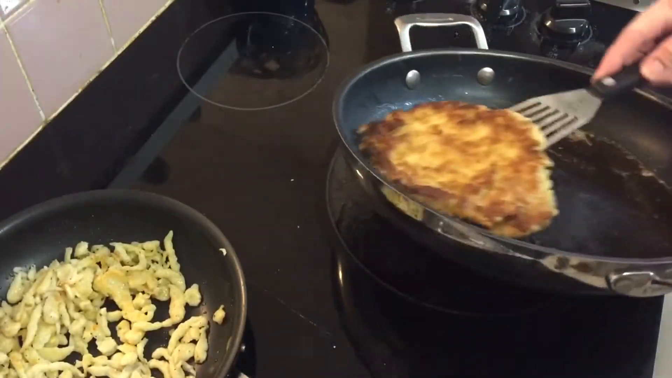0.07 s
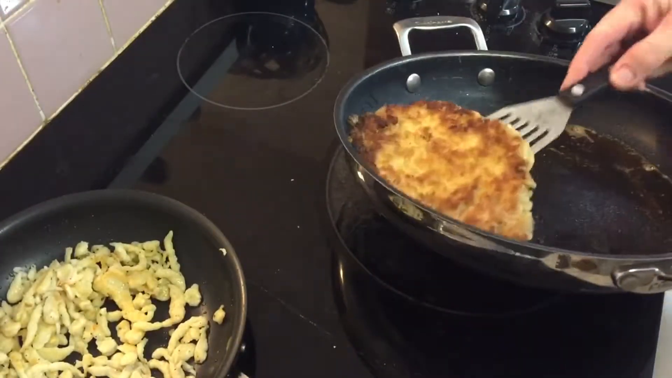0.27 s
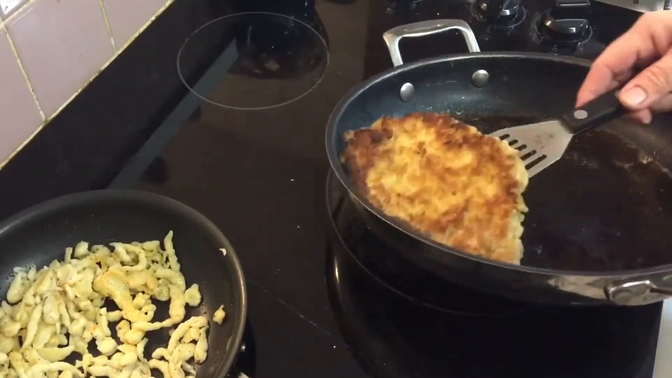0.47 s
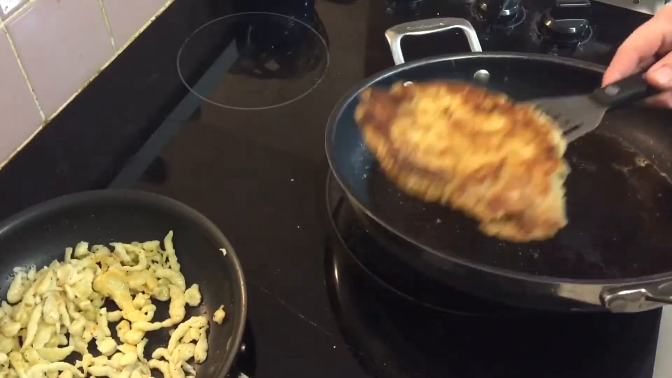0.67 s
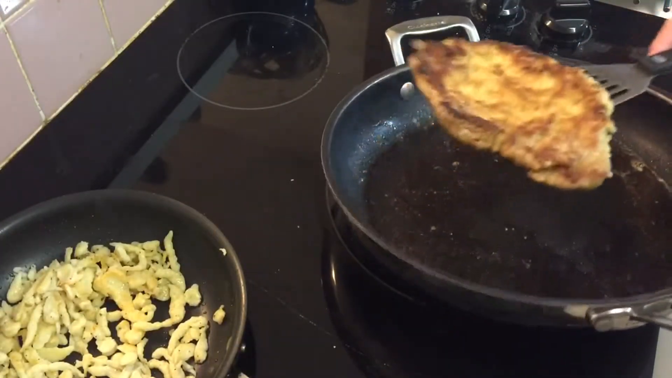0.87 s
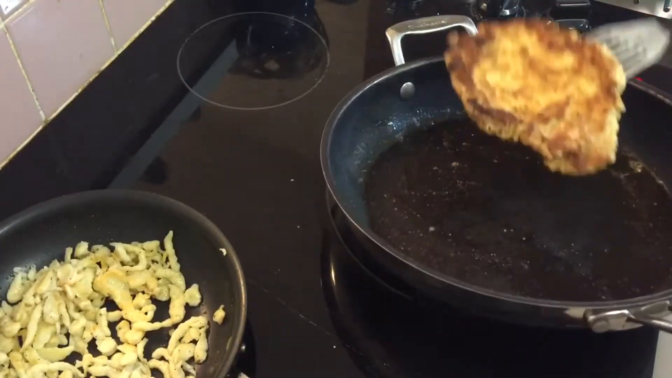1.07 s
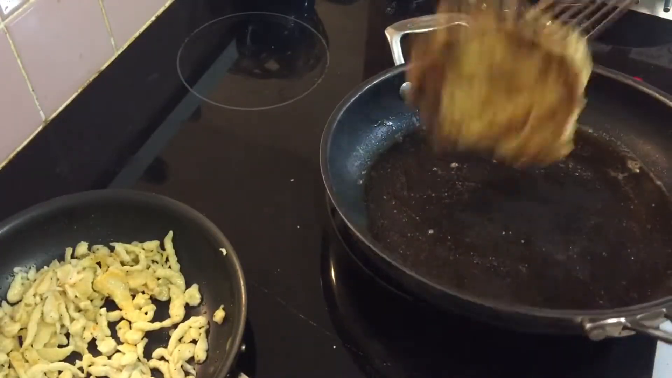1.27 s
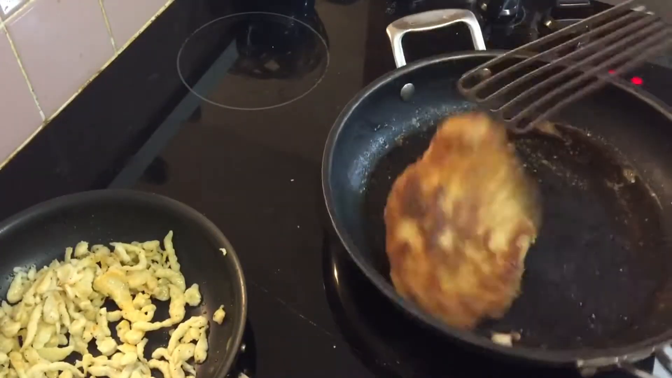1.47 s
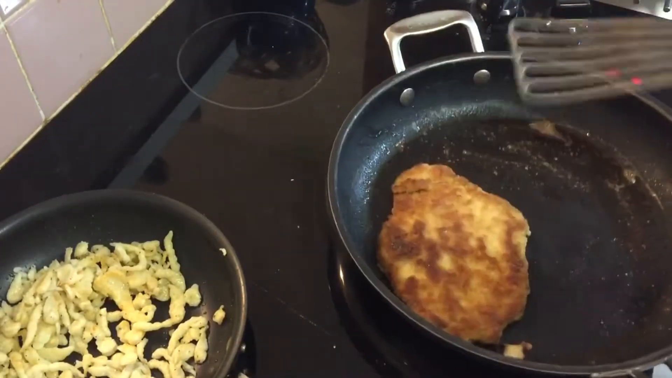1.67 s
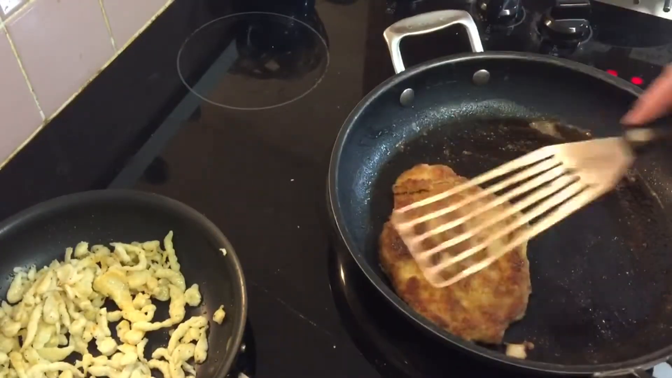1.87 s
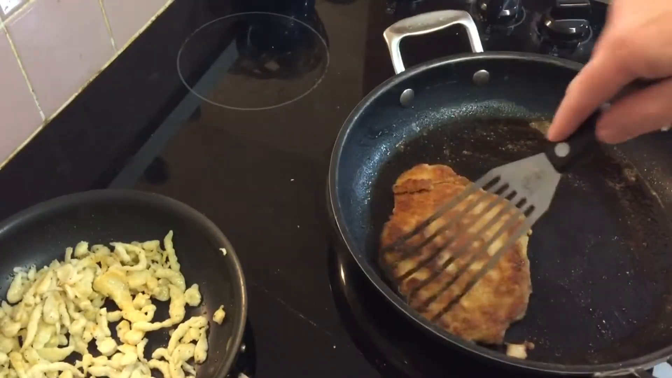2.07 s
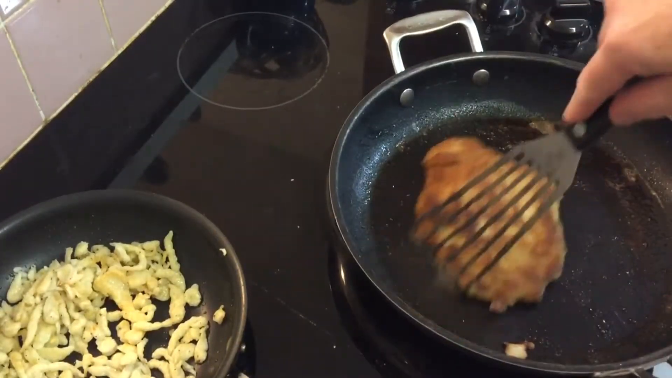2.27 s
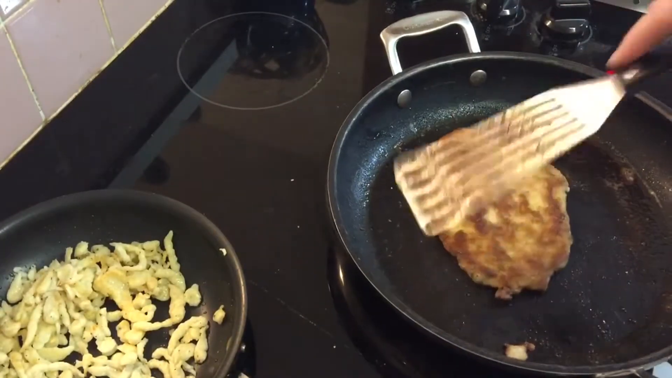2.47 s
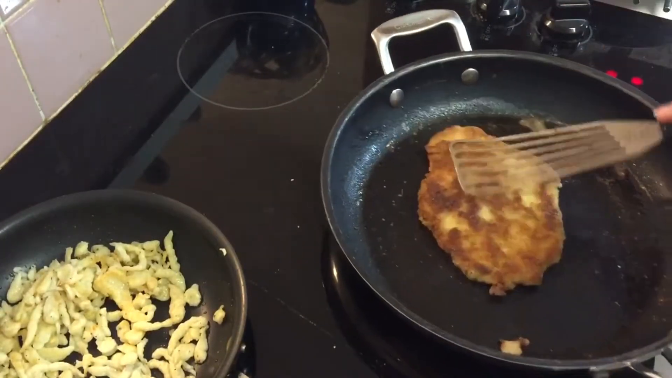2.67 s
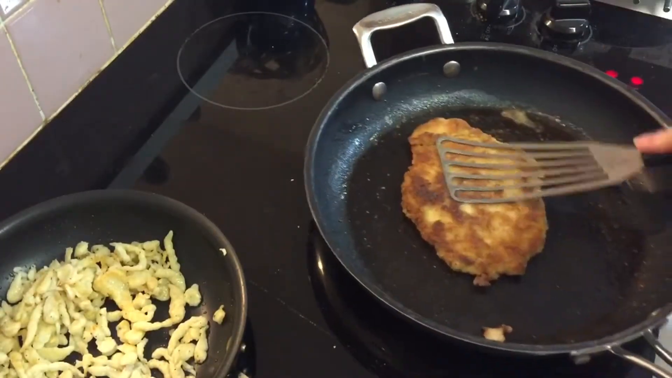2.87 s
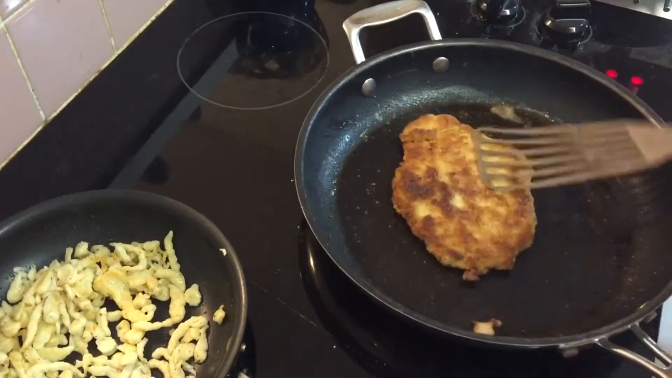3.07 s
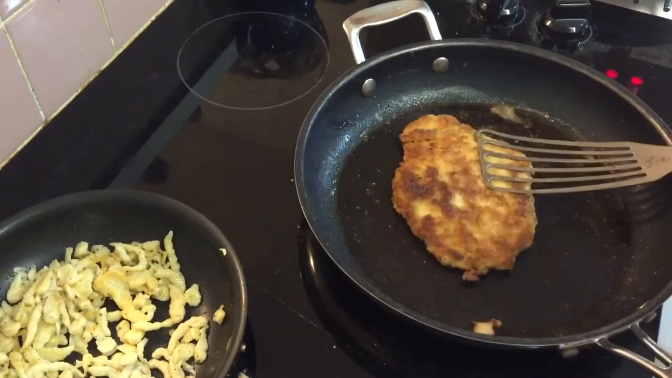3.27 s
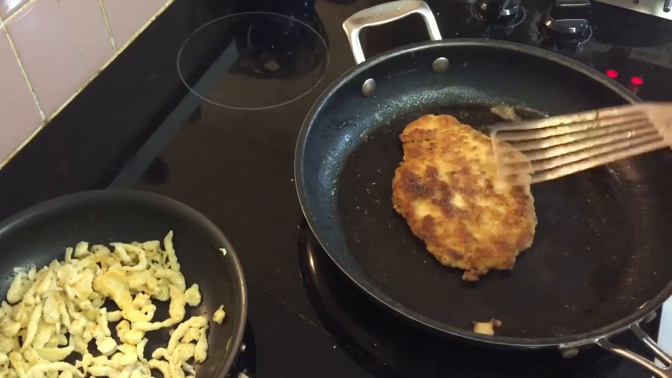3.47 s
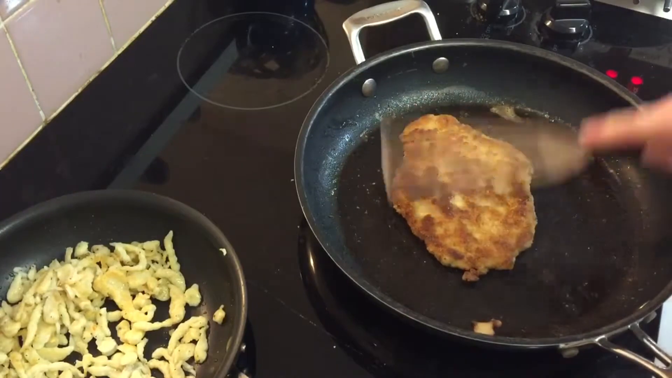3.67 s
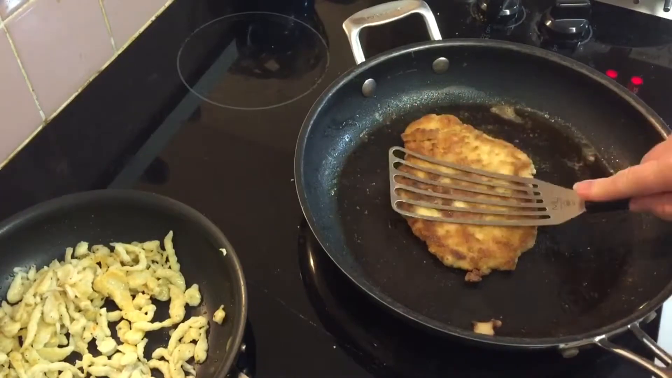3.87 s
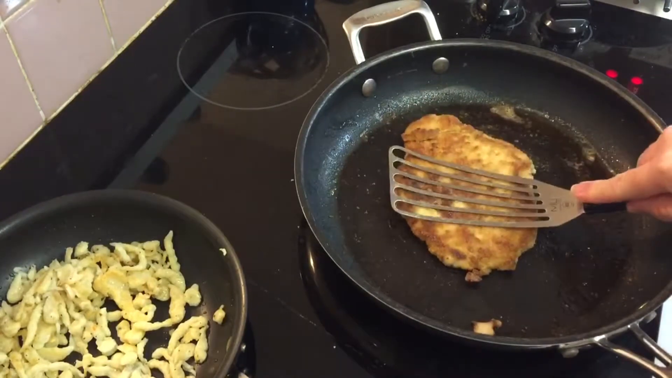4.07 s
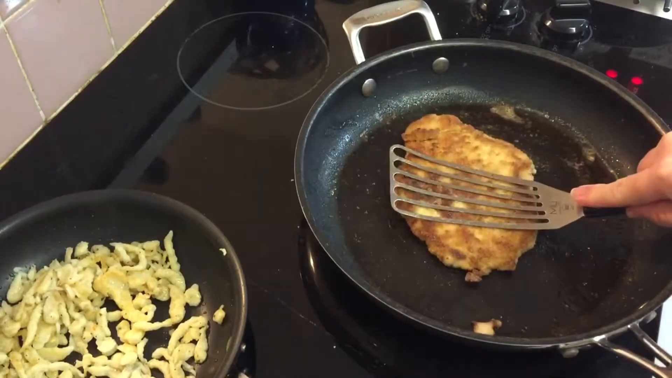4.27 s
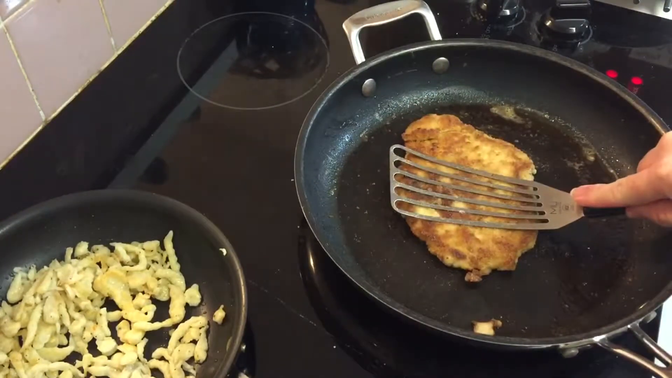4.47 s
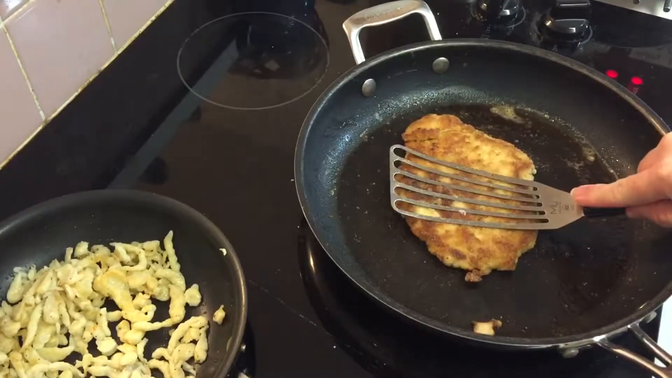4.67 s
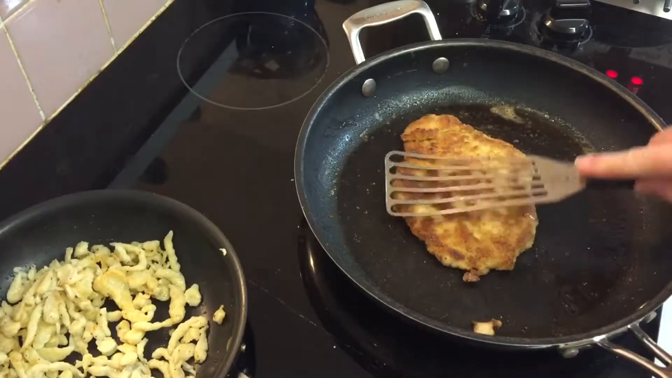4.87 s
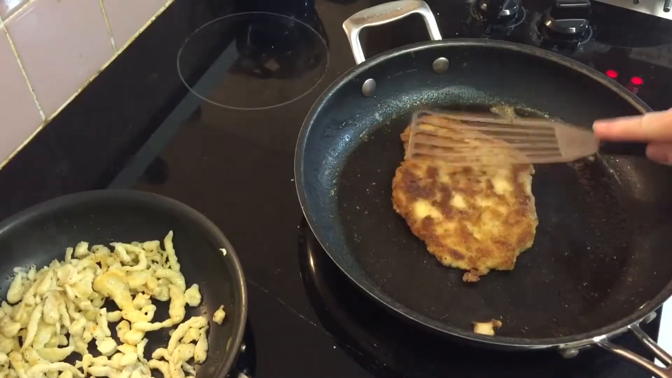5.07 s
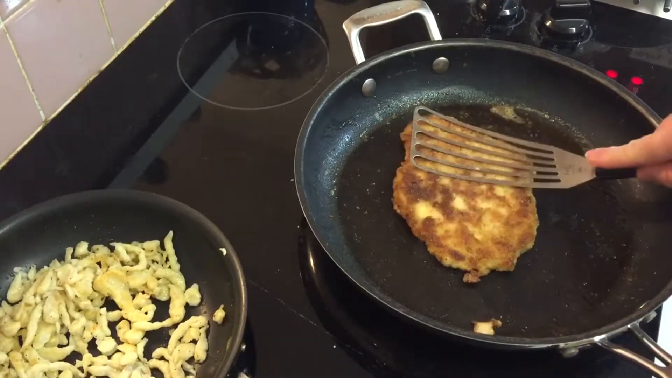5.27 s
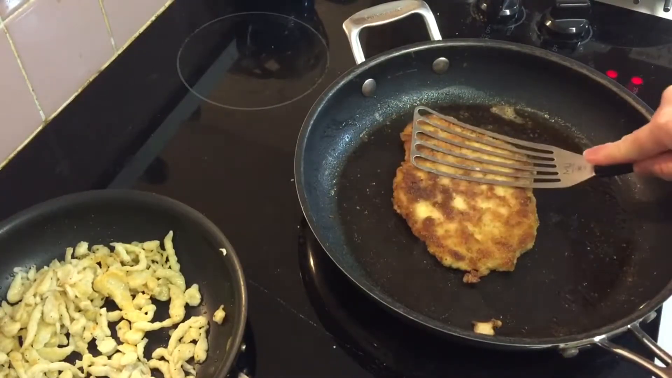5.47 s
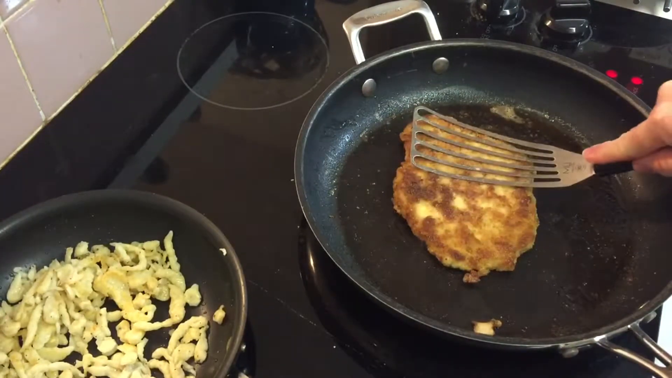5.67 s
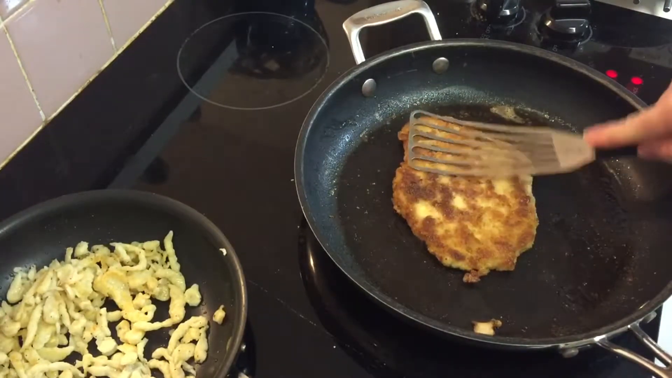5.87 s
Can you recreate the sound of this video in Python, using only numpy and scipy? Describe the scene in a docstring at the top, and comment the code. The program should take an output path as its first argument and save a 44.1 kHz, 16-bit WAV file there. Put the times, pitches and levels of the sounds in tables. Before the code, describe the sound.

Hot oil sizzles and spits in a skillet as a metal spatula scrapes under a cutlet, flips, pats and presses it.

```python
"""Hot oil sizzles in a skillet as a breaded cutlet is scooped up, flipped and pressed.
Steam bubbles of three sizes burst in the oil, drops spit, and steam whistles out of the crust.
A slotted steel spatula scrapes, pats and presses, making the steel ring and the pan thud.
The cooktop hums below, and everything reaches one close microphone."""
import sys
import numpy as np
from scipy import signal
from scipy.fft import rfft, irfft
from scipy.io import wavfile

SR = 44100
rng = np.random.default_rng(int(sys.argv[2]) if len(sys.argv) > 2 else 0)


def dump(signal):
    """Clip the signal to [-1, 1] and save it as 16-bit WAV at the path in sys.argv[1]."""
    limited = np.clip(np.atleast_2d(signal).T, -1, 1)
    pcm = np.round(limited * 32767).astype(np.int16)
    wavfile.write(sys.argv[1], SR, pcm)


N = 261513
TIME = np.arange(N) / SR

# The cooktop's hum. Each row: pitch in Hz, relative level in dB.
HUM_TONES = [(119.5, 2), (240, -19.5)]
# The tone of the low rumble. Each row: frequency in Hz, relative level in dB.
RUMBLE_SPECTRUM = [(12, -74), (20, -69), (49, 2), (91, 1), (113, -16), (133, -7.5), (146, -20), (200, -40),
                   (260, -63), (440, -120)]
# The pan is jolted on the glass top. Each row: time of full strength, hold, rise and fall in seconds,
# then the levels of the shifting and of the rumble in dB.
PAN_JOLTS = [(.3, 0.088, .4, 0.33, -66, -67), (1.6, 0.068, 0.069, 0.21, -52.5, -56),
             (2.22, 0.03, 0.23, 0.19, -54, -65), (2.99, .0, 0.38, 0.27, -63.5, -62),
             (3.28, .05, 0.1, 0.18, -56.5, -67), (4.0, 0.67, 0.25, 0.51, -66.5, -79),
             (5.3, 0.3, .3, .3, -77, -75)]
# Steam whistles, one list each. Each row: time in seconds, pitch in Hz, rasp pitch in Hz,
# rasp level in dB relative to the tone, overall level in dB.
STEAM_WHISTLES = [
    [(1.72, 1015, 2050, -8, -62), (1.76, 1000, 2050, -16, -57.5), (1.85, 982, 2000, -2, -56.5),
     (2.0, 960, 2000, 1, -61.5), (2.14, 955, 1980, -14, -63)],
    [(2.42, 895, 1780, 20, -59), (2.46, 942, 1950, 18, -63), (2.5, 989, 2150, 17, -62.5),
     (2.54, 1015, 2350, 9, -61), (2.59, 1040, 2450, -5, -52)],
]
# How the spatula's blade and the pan ring. Each row: pitch in Hz, width in Hz, relative level in dB.
BLADE_MODES = [(1343, 64, -3), (1917, 43, 1.5), (2280, 110, -5), (2744, 29, 6), (3157, 30, -3),
               (3750, 83, 1), (4635, 53, 0.5), (5100, 32, -10), (5140, 65, -9), (6210, 46, -6),
               (6600, 96, -21), (6800, 43, -16), (7200, 160, -13), (8070, 170, -16)]
PAN_MODES = [(754, 36, -21), (1014, 20, 7), (1180, 48, 7), (1378, 15, 7), (1568, 17, 11.5), (2030, 110, 11),
             (2520, 140, 6.5), (3300, 180, -5), (3710, 82, 5), (4630, 79, 5)]
# The blade slides under the cutlet, then drags off the rim after the flip.
# Each row: time of full strength, hold, rise and fall in seconds, then level in dB.
BLADE_SCOOPS = [(0, .0, .05, 0.095, -37), (.21, 0.0036, .06, 0.19, -57), (.36, 0.042, 0.091, 0.088, -39),
                (.5, .05, .1, 0.18, -59.5)]
RIM_DRAGS = [(1.44, .0, 0.058, .05, -48.5), (1.56, .0, 0.085, 0.087, -43.5),
             (1.625, 0.016, 0.024, .07, -39), (1.74, .0, 0.28, 0.92, -49.5),
             (2.14, 0.023, 0.14, .03, -52.5)]
# The blade knocks the pan or pats the cutlet. Each row: start in seconds, thud level in dB, thud pitch
# in Hz, seconds to fade by 60 dB, slap level in dB, slap's upper edge in Hz, slap decay time in ms.
SPATULA_PATS = [(0.359, -65, 304, 0.12, -40, 7000, 2.7), (0.394, -47, 284, 0.11, -51, 794, 23),
                (0.442, -44, 195, 0.055, -59, 796, 9.7), (1.392, -46.5, 125, 0.081, -54.5, 1000, 13),
                (1.575, -50, 224, 0.12, -63, 1500, 8), (1.618, -45, 201, 0.16, -31.5, 2800, 8.4),
                (2.1554, -20.5, 305, 0.055, -43, 1430, 6.3), (3.144, -53, 101, 0.13, -45, 1500, 9),
                (3.2118, -18, 293, 0.045, -28.5, 634, 13.4), (3.7839, -36.5, 121, 0.076, -28, 3500, 3.9),
                (5.164, -50, 236, 0.047, -47.5, 1200, 2.8), (5.32, -56, 220, 0.071, -60, 800, 5)]
# The pan thuds on the glass top. Each row: multiple of the thud pitch, relative level in dB.
THUD_MODES = [(.35, -2), (.68, 2), (1, 7.5), (1.3, -12), (1.93, -1), (3.7, -7)]
# The clearest drops that spit. Each row: start in seconds, peak in dB, a low frequency in Hz that the
# hollow ring and the snap's lower edge follow, bright ring pitch in Hz, snap decay time in ms.
SPITTING_DROPS = [(0.1674, -21, 5600, 12200, 0.19), (0.6632, -26, 1220, 5700, 0.3),
                  (0.9718, -24.5, 1260, 5500, 0.27), (1.0102, -33, 4000, 6360, 0.19),
                  (1.0742, -37, 7000, 11110, 0.15), (1.0824, -22, 4700, 5420, 0.2),
                  (1.1144, -30, 1660, 9900, 0.22), (1.9074, -22, 5100, 5530, 0.18),
                  (1.91, -20.5, 3840, 9600, 0.34), (1.9573, -22, 3900, 8700, 0.14),
                  (1.9918, -27, 2510, 9260, 0.22), (2.0726, -25, 5930, 9430, 0.12),
                  (2.3393, -10.5, 4600, 9250, 0.42), (2.628, -19.5, 5600, 11840, 0.18),
                  (2.7134, -18.5, 2490, 5730, 0.22), (3.0619, -23, 5210, 9600, 0.16),
                  (3.141, -24, 3300, 9100, 0.24), (3.1648, -20, 3400, 6030, 0.16),
                  (3.1802, -17, 5940, 9600, 0.17), (3.2512, -16, 5400, 6800, 0.15),
                  (3.7547, -10, 5400, 6800, 0.16), (3.8885, -14, 5000, 6800, 0.25),
                  (4.013, -10, 5130, 9300, 0.13), (4.9718, -15, 7100, 13740, 0.2),
                  (5.1249, -18, 4800, 11370, 0.11), (5.1677, -18, 6150, 11840, 0.16),
                  (5.329, -19, 7100, 9350, 0.14)]
# A spit comes back off the pan wall. Each row: typical delay in ms, gain in dB for a large drop.
WALL_ECHOES = [(0.198, -62), (0.749, 6.5), (1.301, -5.5)]
# The tone of the frying. Each row: frequency in Hz, relative level in dB.
FRYING_SPECTRUM = [(210, -75), (350, -30), (521, -19.5), (573, -15), (985, -14.5), (1170, -9.5),
                   (2150, -10.5), (3150, -7.5), (4840, -7.5), (6650, 0), (7670, -3), (9140, 1.5),
                   (15700, -2.5)]
# The echo off the pan wall cancels some pitches. Each row: centre in Hz, width in Hz, gain in dB.
WALL_DIPS = [(5000, 88, -7.5), (7400, 1300, -1.5), (10520, 730, -6.5), (13340, 1200, -5)]
# The oil's steady simmer. Each row: time in seconds, then fine, middle and large bubble levels in dB.
OIL_SIMMER = [(0, -50.5, -57, -63), (.5, -55.5, -63, -66), (.8, -57, -69, -70), (1.37, -57, -67, -70.5),
              (1.5, -45, -49, -53.5), (1.85, -42, -57.5, -63), (2.15, -43, -53.5, -66),
              (2.55, -41.5, -51, -64), (2.77, -45, -57.5, -63.5), (3.12, -41, -56, -76),
              (3.3, -32.5, -44, -51.5), (3.85, -35, -43.5, -52), (5.1, -34, -47, -59),
              (5.93, -32.5, -51, -65)]
# The oil flares when the cutlet moves, lands or is pressed. Each row: time of full strength, hold,
# rise and fall in seconds, then fine, middle and large bubble levels in dB.
OIL_FLARES = [(.06, 0.11, 0.2, 0.054, -40, -50.5, -55.5), (.36, 0.019, 0.047, 0.1, -41.5, -40.5, -49),
              (1.435, 0.014, 0.033, 0.084, -34.5, -41.5, -44.5), (1.55, .0, 0.04, 0.12, -52, -48.5, -48),
              (1.63, 0.045, 0.048, 0.12, -35, -43.5, -42), (2.33, 0.005, 0.13, 0.17, -28, -35.5, -36),
              (2.93, 0.01, 0.15, 0.23, -30.5, -38, -45.5), (3.15, 0, 0.026, 0.18, -52, -48, -50.5),
              (3.23, .0, 0.077, 0.08, -32, -38.5, -40.5), (3.36, 0.1, 0.15, 0.35, -31, -39.5, -46.5),
              (3.9, 0.029, 0.032, .3, -31.5, -38, -47), (4.05, 0.74, 0.28, 0.42, -30, -34.5, -43),
              (5.2, 0, 0.14, .2, -47, -50, -52.5), (5.4, 0.72, 0.18, .3, -37.5, -38.5, -44.5)]
# Fine, middle and large bubbles. Each row: base bursts per second, lowest and highest pitch in Hz.
BUBBLE_SIZES = [(9000, 5000, 16120), (8000, 2174, 5460), (7000, 493.3, 2355)]

HUM_DB, HUM_WANDER_DB = -58.5, 1.5
RESTING_DB = (-76, -73)   # pan shifting and rumble between jolts
ROOM_FADE_S, ROOM_DB = 0.26, -11.5
HARD_SLAP_DB = -9.5   # slap level minus thud level; below this, the thud's upper tones soften
STRAY_DB, STRAY_SPREAD_DB, STRAY_MS = 14, 6, 0.057   # peak above the fine simmer, its spread, decay
CUTOFF_HZ = 15740


def from_db(db):
    """Turn decibels into a gain to multiply by."""
    return 10 ** (np.asarray(db) / 20)


def rms_one(x):
    """Scale a signal so its average power is 1."""
    return x / np.sqrt(np.mean(x ** 2) + 1e-20)


def curves(rows):
    """Join timed rows with straight lines: one curve for each column after the time."""
    times, *columns = np.transpose(rows)
    return [np.interp(TIME, times, column) for column in columns]


def swells(rows, resting_db, slope_db=20):
    """Level curves in dB: each row swells above rest, moving slope_db per rise or fall time."""
    power = from_db(2 * resting_db)
    for full_at, hold, rise, fall, *db in rows:
        before = (full_at - TIME) / max(rise, .005)
        after = (TIME - full_at - hold) / max(fall, .005)
        away = np.maximum(before, after).clip(0, 10)
        power = power + from_db(2 * (np.array(db)[:, None] - slope_db * away))
    return 10 * np.log10(power)


def drift(rate_hz):
    """A smooth random wander with a typical size of 1."""
    step = 40   # samples between random points
    r = np.exp(-2 * np.pi * rate_hz * step / SR)
    slow = signal.lfilter([1], [1, -2 * r, r * r], rng.standard_normal(N // step + 2002))[2000:]
    return np.interp(np.arange(N) / step, np.arange(len(slow)), rms_one(slow))


def band(x, low_hz, high_hz, order=2):
    """Keep what lies between two frequencies."""
    edges = [low_hz, min(high_hz, .45 * SR)]
    return signal.sosfilt(signal.butter(order, edges, "band", fs=SR, output="sos"), x)


def colour(x, spectrum, dips=(), size=16384):
    """Shape a sound's tone to follow a spectrum with dips cut in."""
    hz, points = np.arange(size // 2 + 1) * SR / size + 1, np.array(spectrum)
    db = np.interp(np.log(hz), np.log(points[:, 0]), points[:, 1])
    db += sum(dip_db / (1 + (2 * (hz - dip_hz) / width) ** 2) for dip_hz, width, dip_db in dips)
    # A minimum-phase filter: nothing rings before the click that causes it.
    cepstrum = irfft(np.log(from_db(db)))
    cepstrum[1:size // 2] *= 2
    cepstrum[size // 2 + 1:] = 0
    return signal.fftconvolve(x, irfft(np.exp(rfft(cepstrum))))[:N]


def resonate(x, hz, width_hz):
    """Make a sound ring at one pitch; a narrower width rings longer."""
    r = np.exp(-np.pi * width_hz / SR)
    gain = (1 - r * r) / 2
    return signal.lfilter([gain, 0, -gain], [1, -2 * r * np.cos(2 * np.pi * hz / SR), r * r], x + 1e-18)


def clicks(per_s, spread_db, clump_db):
    """Random clicks of uneven size that come in clumps."""
    sizes = from_db(spread_db * np.minimum(rng.exponential(1, N), 6)) * rng.choice([-1, 1], N)
    happens = rng.random(N) < per_s * from_db(clump_db * drift(15)) / SR
    return rms_one(sizes * happens)


def add(out, start_s, sound):
    """Mix a short sound in at a given time."""
    i = round(start_s * SR)
    out[i:i + len(sound)] += sound[:N - i]


def kitchen_echo(x):
    """The room answers with a short, dull tail of dense echoes."""
    t = TIME[:round(ROOM_FADE_S * SR)]
    tail = band(rng.standard_normal(len(t)), 105, 7200, order=1)
    tail *= from_db(-60 * t / ROOM_FADE_S) * (t > .004)
    return signal.fftconvolve(x, tail / np.sqrt(np.sum(tail ** 2)))[:N]


def cooktop():
    """A wavering hum, a low rumble and the pan shifting on the glass."""
    shift_db, rumble_db = swells(PAN_JOLTS, np.array(RESTING_DB)[:, None])
    hum, hum_db = 0, HUM_DB + HUM_WANDER_DB * drift(2.7)
    for hz, db in HUM_TONES:
        hum += from_db(hum_db + db + 2.8 * drift(15)) * np.sin(2 * np.pi * hz * TIME + 0.69 * drift(11))
    rumble = from_db(rumble_db + 4 * drift(3)) * rms_one(colour(rng.standard_normal(N), RUMBLE_SPECTRUM))
    shift_gain = from_db(shift_db + 4.6 * drift(22))
    shifting = shift_gain * rms_one(band(rng.standard_normal(N), 172, 378, order=3))
    return hum + rumble + shifting


def steam_whistle(rows):
    """Steam leaves the crust as an unsteady gliding tone, with a rough rasp about an octave up."""
    def wobble(width_hz):
        """Random changes of strength and phase that blur a tone."""
        r = np.exp(-np.pi * width_hz / SR)
        noise = rms_one(signal.lfilter([1], [1, -r], rng.standard_normal((2, N))))
        return noise[0] + 1j * noise[1]

    hz, rasp_hz, rasp_db, level_db = curves(rows)
    phase, rasp_phase = 2 * np.pi * np.cumsum([hz, rasp_hz], axis=1) / SR
    tone = (np.exp(1j * phase) * (0.82 + wobble(20))).real
    rasp = from_db(rasp_db) * (np.exp(1j * rasp_phase) * wobble(160)).real
    undertone = .5 * np.cos(phase / 3.5)
    soft_ends = np.clip(np.minimum(TIME - rows[0][0] + .002, rows[-1][0] - TIME) / 0.027, 0, 1)
    return soft_ends * from_db(level_db) * (band(tone + rasp, 990, 3400) + undertone)


def spatula_scrape(strokes, modes):
    """Many tiny slips ring the steel; each pitch swells on its own as the contact moves."""
    slips = clicks(per_s=2500, spread_db=2, clump_db=2)
    ringing = 0
    for k, (hz, width, db) in enumerate(modes):
        ring = rms_one(resonate(resonate(slips, hz, 4 * width), hz, width))
        ringing += from_db(db + 2.4 * drift(18)) * ring * np.sqrt(width) * (-1) ** k
    return from_db(swells(strokes, resting_db=-200)[0]) * rms_one(ringing)


def spatula_pats():
    """A soft blow swings the pan up into a thud, and the crust gives a dull slap."""
    out, t = np.zeros(N), TIME[:13000]
    rise = (1 - np.exp(-t / .0027)) ** 2
    for start, thud_db, hz, fade_s, slap_db, top_hz, slap_ms in SPATULA_PATS:
        soften_db = min(slap_db - thud_db - HARD_SLAP_DB, 0)
        tones = sum(from_db(db + soften_db * (ratio > 1.5)) * np.sin(2 * np.pi * hz * ratio * t)
                    for ratio, db in THUD_MODES)
        thud = band(rise * tones * from_db(-60 * t / fade_s), 62, 4000)
        slap = rms_one(band(rng.standard_normal(len(t)), 220, top_hz)) * np.exp(-1000 * t / slap_ms)
        add(out, start, from_db(thud_db) * thud + from_db(slap_db) * slap)
    return out


def stray_drops(count=40):
    """Rows for extra small drops at random moments, louder when the simmer is louder."""
    when, size, low, ring = rng.random((count, 4)).T
    starts = when * TIME[-1]
    simmer_db = curves(OIL_SIMMER)[0][(starts * SR).astype(int)]
    peak_db = simmer_db + STRAY_DB + STRAY_SPREAD_DB * (2 * size - 1)
    return list(zip(starts, peak_db, 3000 * 1.7 ** low, 5500 * 1.83 ** ring, np.full(count, STRAY_MS)))


def oil_spits(bright_share=0.29):
    """Each drop snaps and sprays; its cavity rings a few cycles, hollow below and bright above."""
    out, t = np.zeros(N), TIME[:400]
    for start, peak_db, low_hz, ring_hz, snap_ms in SPITTING_DROPS + stray_drops():
        noise = rng.standard_normal(len(t))
        spray = (1.9 * noise + 0.78 * (t == 0)) * np.exp(-1000 * t / snap_ms)
        snap = band(spray, .7 * low_hz, 17000)
        bright = np.sin(2 * np.pi * ring_hz * t) * np.exp(-t * ring_hz / 4)
        hollow = 0.095 * np.sin(2 * np.pi * 0.815 * low_hz * t) * np.exp(-t * low_hz / 2.4)
        pop = (1 - bright_share) * snap / np.abs(snap).max() + bright_share * bright + hollow
        pop = band(pop, .5 * low_hz, 19000)
        heard = np.pad(pop, (0, 200))
        path_scale = np.exp(.25 * noise[-1])   # each drop has its own distance to the wall
        echo_gain = min(snap_ms / 0.56, 1)   # small drops echo less
        for delay_ms, db in WALL_ECHOES:
            add(heard, path_scale * delay_ms / 1000, from_db(db) * echo_gain * pop)
        add(out, start, heard * from_db(peak_db) / np.abs(heard).max())
    return out


def oil_sizzle(pitch_count=10):
    """Steam bubbles burst and ring briefly at many pitches; each patch of oil swells on its own."""
    levels_db = swells(OIL_FLARES, np.array(curves(OIL_SIMMER)))
    out, surge_db = 0, 0.68 * drift(24)   # all sizes surge together
    snaps = clicks(per_s=1600, spread_db=3.5, clump_db=-1)   # sharp bursts span every pitch
    merged = from_db(0.34 * (levels_db[0] + 38))   # fiercer frying merges more bursts into hiss
    for (per_s, low_hz, high_hz), level_db in zip(BUBBLE_SIZES, levels_db):
        bursts = clicks(per_s, spread_db=2.5, clump_db=1)
        pitch_choice = rng.integers(0, pitch_count, N)
        rings = 0
        for k, hz in enumerate(np.geomspace(low_hz, high_hz, pitch_count)):
            ring = rms_one(resonate(bursts * (pitch_choice == k), hz, hz / 14.6))
            rings += ring * np.sqrt(hz) * from_db(2 * drift(7))
        hiss = 1.85 * merged * rng.standard_normal(N)
        crackle = (rms_one(rings) + snaps + hiss) / np.sqrt(1 + merged ** 2)
        in_pan = band(colour(crackle, FRYING_SPECTRUM, WALL_DIPS), low_hz, high_hz, order=3)
        out += rms_one(in_pan) * from_db(level_db + surge_db + 0.57 * drift(32))
    return out


def scene():
    """All sources reach one microphone, which feeds both channels."""
    scrapes = spatula_scrape(BLADE_SCOOPS, BLADE_MODES) + spatula_scrape(RIM_DRAGS, PAN_MODES)
    spits, pats, sizzle = oil_spits(), spatula_pats(), oil_sizzle()
    whistles = sum(map(steam_whistle, STEAM_WHISTLES))
    echo = from_db(ROOM_DB) * kitchen_echo(pats + from_db(-2.5) * spits)
    mono = cooktop() + echo + whistles + scrapes + pats + spits + sizzle
    return np.array([mono, mono])


def record(dry):
    """The highest treble is cut off steeply."""
    return signal.sosfilt(signal.ellip(14, .3, 75, CUTOFF_HZ, fs=SR, output="sos"), dry)


dry = scene()
out = record(dry)
dump(out)
```